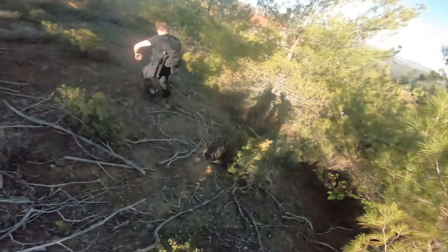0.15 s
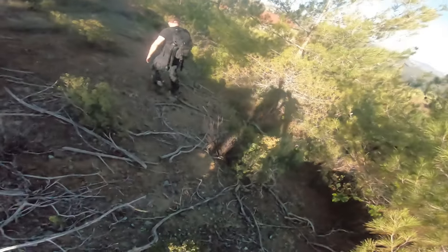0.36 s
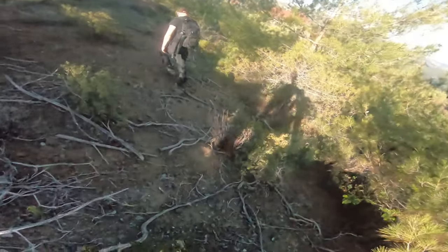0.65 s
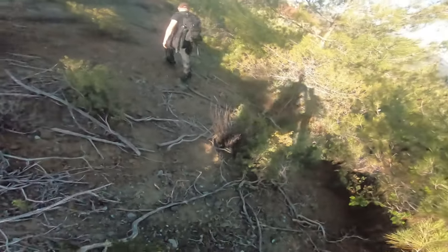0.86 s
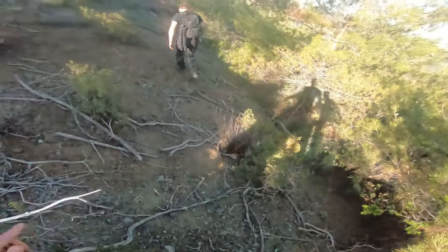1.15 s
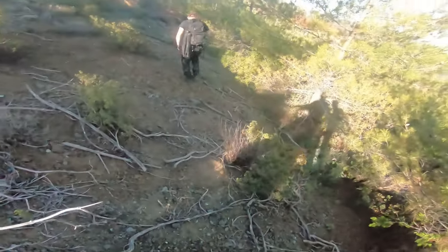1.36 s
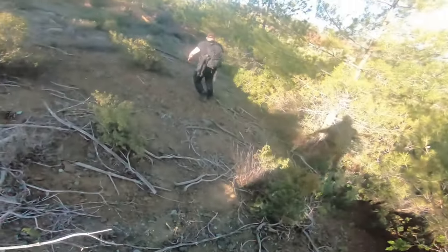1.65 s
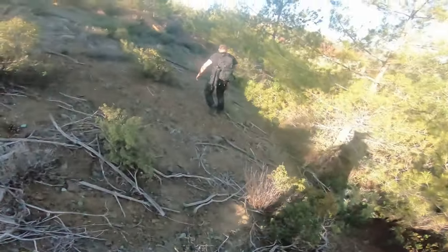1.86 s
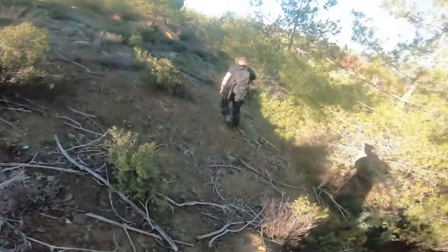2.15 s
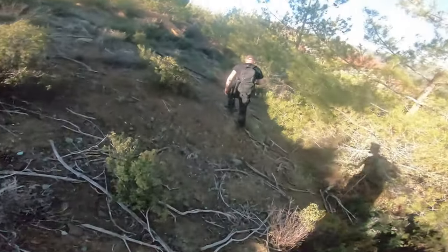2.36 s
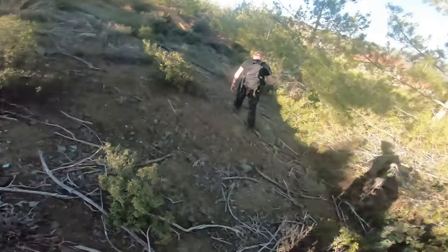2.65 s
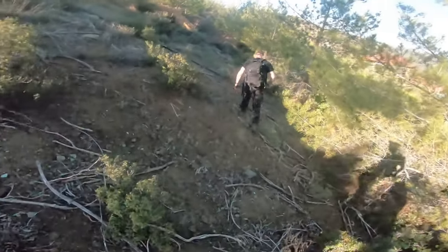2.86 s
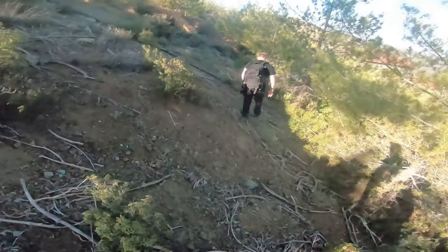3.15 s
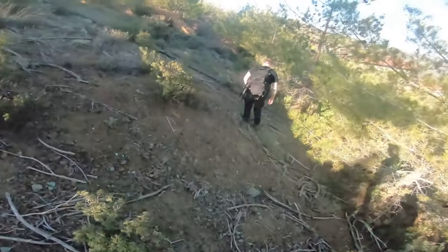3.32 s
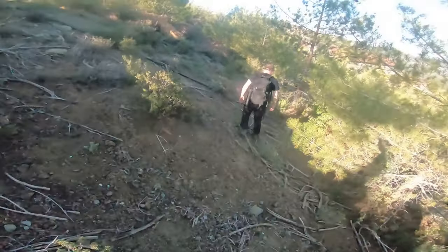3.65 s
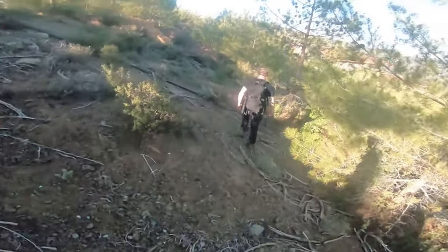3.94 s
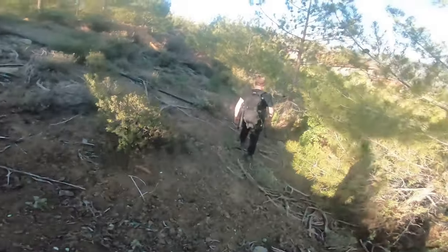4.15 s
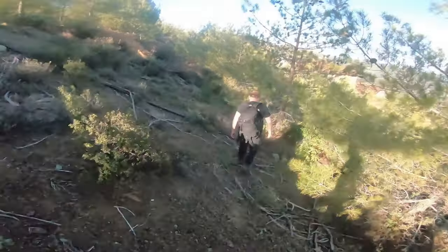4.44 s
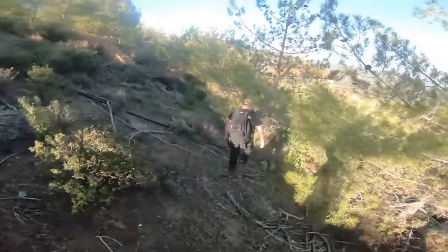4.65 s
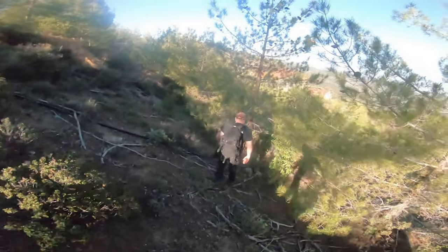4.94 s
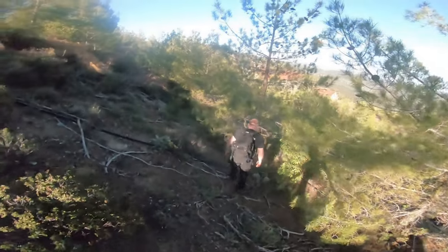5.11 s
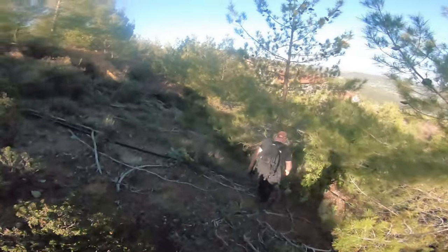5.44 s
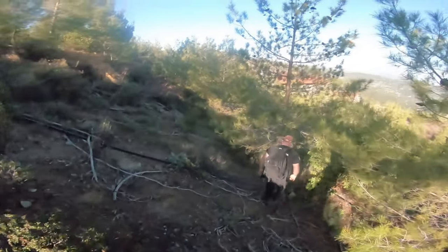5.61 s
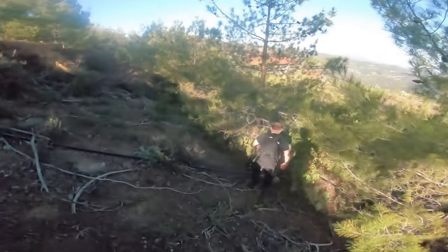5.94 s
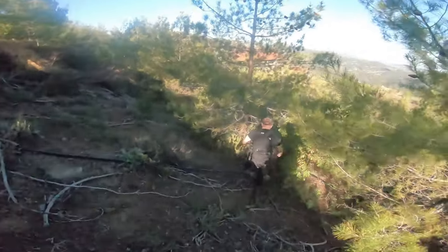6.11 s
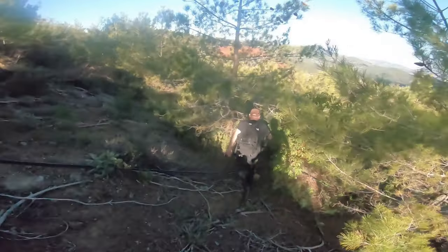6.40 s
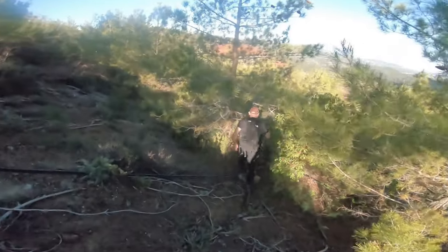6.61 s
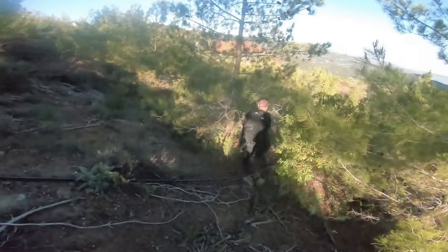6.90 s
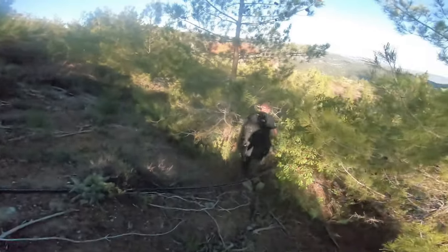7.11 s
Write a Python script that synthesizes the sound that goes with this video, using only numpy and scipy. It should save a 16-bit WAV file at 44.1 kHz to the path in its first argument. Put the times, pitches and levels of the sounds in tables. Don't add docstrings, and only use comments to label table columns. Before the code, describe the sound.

Close, brittle footsteps over dead twigs and needles, with crackles, one very sharp branch crack, cloth rustle and faint wind buffeting outdoors.

```python
import sys
import numpy as np
from scipy import signal
from scipy.fft import rfft, irfft, next_fast_len
from scipy.io import wavfile
from scipy.ndimage import uniform_filter1d

SR = 44100
rng = np.random.default_rng(int(sys.argv[2]) if len(sys.argv) > 2 else 0)


def nominal_scale(level):
    x = np.asarray(level, float) / 20
    return 10 ** x


def wav_out(sig):
    wavfile.write(sys.argv[1], SR, np.round(np.clip(np.atleast_2d(sig).T, -1, 1) * 32767).astype(np.int16))


N = 320607


def unit(x):
    return x / np.sqrt(np.mean(x ** 2) + 1e-20)


def along(points, hz):
    point_hz, value = np.transpose(points)
    return np.interp(np.log(hz + 1), np.log(point_hz + 1), value)


def sides(pan_db):
    left, right = nominal_scale(pan_db / 2), nominal_scale(-pan_db / 2)
    return 2 * np.array([left, right]) / (left + right)


def coloured(x, spectrum):
    m = next_fast_len(N + 8192)
    gain = nominal_scale(along(spectrum, np.fft.rfftfreq(m, 1 / SR)))
    return unit(irfft(rfft(x, m) * gain, m)[..., :N])


def pair(alike):
    a, b = rng.standard_normal((2, N))
    turn = np.arccos(np.clip(alike, -1, 1)) / 2
    return np.cos(turn) * a + np.sin(turn) * np.array([b, -b])


def bursts(rate, spread_db, t60, bed):
    moment, chance = rng.random((2, N))
    size_db = spread_db * np.minimum(-np.log(chance + 1e-9), 3.2)
    size = (moment < rate / SR) * nominal_scale(size_db)
    power = signal.lfilter([1], [1, -nominal_scale(-120 / (t60 * SR))], size ** 2)
    return np.sqrt(power / np.mean(power) + bed ** 2)


def swells(s, peak_db, rise, fall, rest_db, roundness):
    t = np.arange(0, N + 64, 64) / SR
    late = t - s[:, None]
    slope_s = np.where(late < 0, rise[:, None], fall[:, None])
    away = np.abs(late) / np.clip(slope_s, .01, 2)
    power = nominal_scale(2 * (peak_db[:, None] - 10 * away ** roundness)).sum(0) + nominal_scale(2 * rest_db)
    return np.interp(np.arange(N) / SR, t, 10 * np.log10(power))


def place(rows, starts):
    index = np.round(starts * SR).astype(int)[:, None] + np.arange(rows.shape[-1])
    return np.array([np.bincount(index.ravel(), r.ravel(), N + SR)[:N] for r in rows])


# (time [s], boot left-right [dB], rub left-right [dB])
BEARINGS = [(0.0, 2, 1), (0.83, -6.5, -6), (1.4, 0, 1.5), (2.21, -2, -9), (2.57, -10, -6.5),
            (2.93, -3.5, -3), (3.3, -11.5, -5.5), (3.66, -3.5, 2), (4.25, -10.5, -12), (4.46, -2, -3),
            (4.76, -14, -11.5), (4.92, -2.5, -7.5), (6.52, -8.5, -11), (7.27, -7.5, -3)]


def bearing():
    s, boot_db, rub_db = np.transpose(BEARINGS)
    t = np.arange(N) / SR
    return np.interp(t, s, boot_db), np.interp(t, s, rub_db)


# (frequency [Hz], level [dB])
PORT_RESPONSE = [(100, -35), (160, 10), (7800, -6.5), (9000, -6.5), (11000, -18.5), (15000, -26),
                 (16500, -60)]
# (frequency [Hz], lead of the left side [rad])
PORT_PHASE = [(4500, 1), (6800, -1), (9200, -2), (11500, -8.5), (15200, -7.5)]


def breaks(rows, size):
    s, peak_db, ring_hz, t60, share = np.transpose(rows)[:, :, None]
    t = np.arange(size) / SR
    noise = rng.standard_normal((len(rows), 2, size))
    stereo = np.array([noise[:, 0] + 0.22 * noise[:, 1], noise[:, 0] - 0.3 * noise[:, 1]])

    life = np.clip(t60, .002, .12)
    onset = 1 - np.exp(-t / (0.011 * life))
    decay = nominal_scale(-60 * t / life) + nominal_scale(-7.5 - 60 * t / (4 * life))
    splinter = decay * onset * (t < t[-1] / 2)
    kick = 9 * np.exp(-life / 0.015) * (np.arange(size) == 8)

    f = np.fft.rfftfreq(size, 1 / SR)
    width = np.clip(share, .04, 3) * ring_hz
    ring = 1j * f * width / (ring_hz ** 2 - f ** 2 + 1j * f * width)
    bare = 1j * f / (1200 + 1j * f) / (1 + 1j * f / (3.9 * ring_hz)) ** 2
    stick = ring ** 2 + nominal_scale(-20) * np.clip(share, 0, 1) * bare
    lead = along(PORT_PHASE, f) * np.array([[[1]], [[-1]]])
    ports = nominal_scale(along(PORT_RESPONSE, f)) * np.exp(.5j * lead)
    crack = irfft(rfft(stereo * splinter + kick) * stick * ports, size)
    crack = crack / np.abs(crack).max(2, keepdims=True).mean(0)

    at = np.minimum(s * SR, N - 1).astype(int)
    boot_db, rub_db = bearing()
    pan_db = np.where(ring_hz < 1800, rub_db[at], boot_db[at])
    return place(np.roll(crack, 64, axis=2) * nominal_scale(peak_db) * sides(pan_db), s[:, 0] - 64 / SR)


def with_width(kinds):
    return [(*row, width) for rows, width in kinds for row in rows]


# (time of most pressure [s], crunch [dB], 10 dB rise [s], 10 dB fall [s], brightness [dB])
SOLE_LOADS = [(.05, -50, 0.2, 0.26, -5.5), (0.209, -49, 0.05, .15, -10), (.32, -51, .15, .04, -8),
              (.69, -48.5, 0.13, 0.4, -3.5), (1.29, -47.5, 0.21, 0.18, -3), (1.44, -49.5, 0.06, 0.2, -2),
              (1.68, -46, 0.1, 0.47, -4), (2.24, -51, .4, 0.13, -5.5), (2.54, -47, 0.2, 0.09, -2.5),
              (2.7, -59, -0.7, 0, 4), (3.09, -57, 0.95, 0, -4.5), (3.26, -40, 0.01, 0.085, -5),
              (3.45, -49, -0.05, 0.31, -3.5), (4.28, -47, 0.16, 0.25, -3.5), (4.38, -52, -0.09, 0.27, 1),
              (4.48, -53, -0.18, 0, 1.5), (4.667, -43, 0.0845, 0.11, -0.5), (4.6, -48, .03, .1, 2),
              (4.745, -48, .1, .02, -1), (4.916, -44.5, -0.06, 0.17, -2), (5.09, -48.5, 0.16, -0.18, -4),
              (5.215, -54.5, -0.17, 1.8, -1.5), (5.72, -54.5, 0.2, 0.85, -1), (5.98, -38, 0.06, 0.08, -4.5),
              (6.35, -51.5, .06, .25, -1.5), (6.47, -50, .12, .1, -3), (6.605, -48, 0, 0.7, 1.5),
              (7.16, -49, 0.17, 2, -2)]


def pressure():
    s, peak_db, rise, fall, bright_db = np.transpose(SOLE_LOADS)
    rest_db, rest_bright_db, roundness = -63.5, -10, 1.08
    crunch_db = swells(s, peak_db, rise, fall, rest_db, roundness)
    fizz_db = swells(s, peak_db + bright_db, rise, fall, rest_db + rest_bright_db, roundness)
    return crunch_db, fizz_db - crunch_db


# (frequency [Hz], level [dB])
CRUNCH_COLOUR = [(600, -13), (1300, 0), (2200, 0), (3200, 2.5), (4200, -2.5), (5500, -8), (8000, -95)]
FIZZ_COLOUR = [(2800, -35), (4700, -2), (6000, -1.5), (7800, -2), (9000, -6.5), (10500, -16), (12500, -74)]
SIZZLE_COLOUR = [(8500, -7), (10500, 1), (13000, -1), (15600, -15)]


def litter():
    crunch_db, bright_db = pressure()
    pan_db = bearing()[0]
    shared = bursts(260, spread_db=2.6, t60=.012, bed=1.15)
    coarse = bursts(200, spread_db=3, t60=.02, bed=1.3)
    fine = bursts(300, spread_db=3, t60=.01, bed=1.3)
    crunch = coloured(shared * coarse * pair(0.63), CRUNCH_COLOUR)
    fizz = coloured(shared * fine * pair(0.041), FIZZ_COLOUR)
    sizzle = sides(0.094 * pan_db) * coloured(shared ** 0.67 * fine * pair(-0.2), SIZZLE_COLOUR)
    fizz_db = crunch_db + bright_db
    sizzle_db = fizz_db - 18.5 + 0.35 * (fizz_db + 54.5)
    body = nominal_scale(crunch_db) * crunch + nominal_scale(fizz_db) * fizz
    return sides(pan_db) * body + nominal_scale(sizzle_db) * sizzle


# (frequency [Hz], level [dB])
FLOOR_COLOUR = [(70, -36), (170, 10), (1800, 0.5), (3200, 1), (8000, -3.5), (10500, -17), (13000, -53)]


def floor():
    return nominal_scale(-51.5 - 7.5) * coloured(pair(0.11), FLOOR_COLOUR)


def crackle(count):
    moment, pitch, chance, life, share = rng.random((count, 5)).T
    s = .01 + moment * (N / SR - .02)
    crunch_db = pressure()[0][(s * SR).astype(int)]
    peak_db = crunch_db + 6.5 + 2.5 * np.minimum(-np.log(chance + 1e-9), 2.1)
    ring_hz = 2000 * 4 ** pitch
    t60 = 0.0025 + 0.0067 * life ** 2
    return breaks(np.transpose([s, peak_db, ring_hz, t60, .7 + 1.5 * share]), size=512)


# (time [s], peak [dB], ring [Hz], t60 [s])
THIN_TWIGS = [(.0352, -37, 4040, 0.0074), (.429, -36, 3320, .014), (.4923, -34, 3450, 0.0036),
              (.698, -29.5, 690, 0.0068), (.9494, -35, 925, 0.0083), (1.4447, -29.5, 750, 0.013),
              (1.598, -35.5, 3230, 0.14), (1.7355, -28, 3980, .005), (1.7445, -29, 3780, .013),
              (1.7666, -31.5, 3870, 0.024), (1.8484, -31, 1240, 0.0093), (2.0442, -38, 2950, .021),
              (2.1608, -32, 4480, 0.0025), (2.2861, -34, 940, 0.016), (2.398, -31.5, 950, 0.013),
              (2.67, -37.5, 2610, 0.0051), (2.999, -35, 694, .015), (3.272, -33, 1520, 0.026),
              (3.408, -34.5, 2690, 0.012), (4.4508, -28, 4020, 0.029), (4.6779, -27.5, 820, 0.14),
              (5.0366, -33, 4350, 0.025), (5.317, -34, 1040, 0.051), (5.9598, -20, 3770, 0.021),
              (6.026, -24, 3000, 0.0041), (6.6885, -33, 3250, 0.016), (6.8606, -31.5, 2880, 0.012),
              (6.9272, -25, 6800, 0.0042), (6.9785, -22, 3150, 0.0025)]
# (time [s], peak [dB], centre [Hz], t60 [s])
SHATTERED_WOOD = [(.3532, -25.5, 910, 0.0037), (.3753, -29, 1510, 0.0061), (.668, -34, 1330, 0.0098),
                  (.8393, -31.5, 4070, 0.038), (1.279, -37, 5000, .012), (1.4297, -30, 1950, .015),
                  (2.5154, -29, 3400, 0.022), (2.7071, -36, 5100, 0.032), (3.1405, -35.5, 1140, 0.029),
                  (3.2275, -22.5, 2730, 0.035), (3.2473, -18.5, 3500, 0.02), (3.9444, -34.5, 1540, 0.0064),
                  (4.3842, -25.5, 4800, 0.0095), (4.514, -24.5, 2790, 0.017), (4.5775, -31, 5600, 0.14),
                  (4.6715, -24, 1800, 0.016), (4.7276, -24, 1190, 0.0046), (5.238, -31, 3520, 0.052),
                  (5.477, -29.5, 2920, 0.0054), (5.6043, -21.5, 4130, 0.014), (5.834, -28, 2900, 0.019),
                  (5.9495, -18, 3730, 0.03), (5.9833, -20, 3380, 0.028), (6.005, -26, 3000, .028),
                  (6.0137, -18.5, 3640, 0.015), (6.5984, -29.5, 6030, 0.025), (6.7646, -28.5, 4900, 0.039),
                  (6.7894, -24.5, 3820, 0.014), (7.03, -29.5, 2160, 0.039), (7.211, -25.5, 4420, .003)]
# (time [s], peak [dB], ring [Hz], t60 [s])
THICK_TWIGS = [(.5546, -35.5, 930, 0.0052), (.791, -26, 2520, 0.0043), (.9992, -36, 1500, .004),
               (1.1693, -31, 4720, 0.013), (1.2895, -34.5, 1890, 0.035), (1.384, -28.5, 5000, .003),
               (2.0665, -22.5, 3720, 0.012), (2.207, -31.5, 5470, 0.04), (2.4446, -32.5, 1930, 0.011),
               (2.4743, -30, 880, 0.022), (2.5322, -24.5, 6700, 0.017), (2.56, -19, 8800, 0.002),
               (2.5615, -33, 1800, 0.008), (2.64, -31, 1010, 0.0057), (2.8223, -30.5, 5100, 0.0054),
               (3.2648, -22, 2700, 0.017), (3.3052, -24, 5600, 0.012), (3.3735, -29.5, 2050, .015),
               (3.867, -35, 880, 0.0068), (4.5382, -27, 3960, 0.0088), (4.7632, -31, 990, 0.004),
               (4.77, -17, 930, 0.0018), (4.9242, -31, 5350, 0.017), (5.153, -33.5, 4400, 0.022),
               (5.3574, -27, 4500, 0.0077), (5.4829, -31.5, 1150, 0.0051), (5.5186, -32, 4800, 0.0076),
               (5.9195, -25, 3500, 0.024), (5.9923, -17.5, 4400, 0.02), (6.7078, -24.5, 5700, 0.0059)]
# (time [s], peak [dB], ring [Hz], t60 [s])
RINGING_STICKS = [
    (1.661, -35, 4200, 0.022),
    (1.672, -26.5, 3360, .02),
    (1.673, -35, 5300, 0.016),
    (1.6778, -24.5, 3330, 0.0073),
    (4.3732, -31.5, 5300, 0.0079),
    (4.467, -35, 4900, 0.028),
    (5.1527, -36.5, 1620, 0.012),
    (6.727, -38, 1650, 0.043),
]
CLICK_WIDTH, SHARD_WIDTH = 0.56, 2.2


def snaps():
    kinds = [(RINGING_STICKS, 0.11), (THIN_TWIGS, CLICK_WIDTH), (THICK_TWIGS, 0.93), (SHATTERED_WOOD, SHARD_WIDTH)]
    return breaks(with_width(kinds), size=4096)


# (time [s], peak [dB], ring [Hz])
HOUSING_KNOCKS = [(0.085, -36.5, 365), (0.124, -36, 161), (0.889, -44, 224), (2.816, -45.5, 164),
                  (2.904, -46, 322), (3.006, -40, 250), (3.539, -39, 340), (5.054, -39.5, 270),
                  (.649, -51, 226), (.82, -51, 132), (1.421, -46, 148), (1.497, -41, 332),
                  (1.842, -51, 226), (2.286, -48, 260), (3.224, -50, 154), (3.376, -55, 228),
                  (3.412, -44, 380), (3.62, -44.5, 383), (4.51, -49, 280), (4.583, -43, 330),
                  (4.611, -45, 229), (4.76, -55, 80), (4.891, -50, 189), (4.951, -48.5, 202),
                  (5.286, -48, 180), (5.543, -47, 235), (5.744, -45, 189), (5.97, -47, 202),
                  (6.03, -55.5, 80), (6.849, -54, 213)]


def knocks():
    s, peak_db, ring_hz = np.transpose(HOUSING_KNOCKS)[:, :, None]
    cycles = ring_hz * np.arange(4096) / SR
    ring = np.sin(2 * np.pi * cycles) * cycles * np.exp(1 - cycles) / 0.59
    left_right = nominal_scale([[[-.7]], [[.7]]])
    return place(nominal_scale(peak_db - 1.0) * ring * left_right, s[:, 0])


# (time [s], peak [dB], ring [Hz], t60 [s])
SMALL_STICKS = [(.087, -30, 610, .01), (.779, -33, 622, .01), (.888, -38, 568, .008),
                (1.562, -42, 732, .008), (1.575, -35, 600, 0.011), (1.603, -34, 730, 0.013),
                (1.675, -35, 655, 0.0087), (2.063, -36, 546, .008), (2.272, -36, 700, .006),
                (2.359, -33, 810, .008), (2.513, -33, 880, .008), (2.606, -39.5, 896, .008),
                (2.802, -41, 625, .008), (4.17, -37, 781, 0.013), (4.249, -32, 869, .012),
                (4.655, -33, 678, .012), (5.005, -35, 890, 0.0095), (5.065, -35, 1010, .008),
                (5.075, -34.5, 700, .008), (5.224, -39, 810, 0.0093), (5.602, -33.5, 1150, 0.0072),
                (5.878, -38, 829, .008), (6.36, -34, 895, 0.011), (6.456, -37, 1000, 0.013),
                (6.688, -47, 1120, 0.005), (1.688, -27, 3300, .012), (1.688, -31, 5300, .008),
                (5.165, -43.5, 3250, .04), (3.2473, -26, 6700, 0.0054), (3.2648, -29, 7900, 0.0061),
                (2.5415, -26, 7200, .006), (.9988, -22, 2500, .002), (.899, -35, 7800, .003),
                (4.6718, -26, 6500, .004), (4.9232, -30, 8800, .004), (5.3567, -31, 3400, .004),
                (5.953, -25, 1400, .015), (3.268, -27, 3000, .02), (6.79, -27, 2600, .004),
                (7.0295, -29, 1700, .004), (4.265, -33, 5000, .006), (3.577, -37, 7800, .004),
                (3.086, -39, 7800, .004), (3.756, -39, 3200, .004), (2.962, -39, 6500, .004),
                (4.72, -31, 1000, .02), (4.70, -30, 850, .02), (.175, -38, 6500, .004)]
# (time [s], peak [dB], centre [Hz], t60 [s])
MORE_SHATTERED_WOOD = [(.8275, -31, 3060, .005), (1.2032, -39, 3650, .005), (1.4277, -27, 5000, .004),
                       (1.716, -35, 4200, .005), (2.2872, -33, 2500, 0.0057), (2.3795, -31, 3500, .004),
                       (2.4165, -39, 5000, .004), (2.4758, -26, 5460, 0.0072), (2.5027, -33, 4020, .01),
                       (2.6389, -33, 5000, 0.0049), (3.221, -35, 1500, 0.013), (3.284, -32, 3500, 0.0091),
                       (3.292, -29.5, 2500, 0.0067), (4.5905, -27, 2730, 0.0082), (4.7691, -32, 5000, .003),
                       (4.852, -41, 6000, 0.011), (4.9057, -35, 2800, 0.0065), (4.9696, -29, 4020, 0.013),
                       (5.11, -35, 4000, .01), (5.205, -40, 3500, .02), (5.4779, -33, 5260, 0.0045),
                       (5.716, -34, 3500, 0.023), (5.785, -37, 5500, .006), (5.9529, -12, 4160, 0.01),
                       (5.968, -18, 3200, .008), (6.0526, -29, 3400, .006), (6.065, -31, 5200, 0.0056),
                       (6.159, -34, 8000, .006), (6.2025, -39, 7000, .004), (6.376, -36, 3500, .005),
                       (6.445, -37, 5500, 0.0045), (6.5809, -32.5, 3230, 0.0064), (6.607, -25, 4000, 0.0058),
                       (6.64, -33, 5000, 0.015), (6.689, -30, 6500, .004), (6.8463, -31.5, 2200, .008),
                       (6.9027, -28, 6740, .006)]
# (time [s], peak [dB], ring [Hz], t60 [s])
THICK_BRANCH = [
    (2.56, -5.5, 7720, 0.0024),
    (2.56, -12, 5600, 0.0025),
    (2.56, -20.5, 4000, 0.0023),
    (2.56, -25.5, 3300, 0.0018),
    (2.5602, -30, 1610, 0.0037),
    (2.566, -31, 7000, .004),
]


def chips():
    kinds = [(THICK_BRANCH, .22), (SMALL_STICKS, CLICK_WIDTH), (MORE_SHATTERED_WOOD, SHARD_WIDTH)]
    return breaks(with_width(kinds), size=2048)


# (time [s], bump [dB], rub [dB], 10 dB fall [s])
CLOTH_SWINGS = [(.1, -40.5, -41.5, 0.1052), (.22, -49.5, -45.5, 0.11), (.31, -53, -50, .06),
                (0.722, -44.5, -43.5, 0.12), (.95, -52.5, -55.5, 0.2), (1.17, -56, -48.5, 0.1),
                (1.45, -42.5, -45, 0.08), (1.58, -51, -48, 0.08), (1.68, -44.5, -51.5, .08),
                (1.864, -47, -44.5, 0.0952), (2.078, -53, -48, 0.04), (2.29, -49, -47, .09),
                (2.43, -53, -60, 0.06), (2.56, -53, -51, 0.27), (2.819, -46, -57, -0.08),
                (2.91, -69, -66, 1), (3.04, -58, -53, 0.2), (3.19, -57, -52.5, 0.28),
                (3.538, -51, -48.5, 0.14), (4.19, -52, -47, .15), (4.37, -56, -51, .12),
                (4.275, -47, -42.5, 0.08), (4.5, -46, -62, -0.07), (4.68, -44, -43, 0.09),
                (5.069, -47, -46, 0.04), (5.344, -43.5, -44, -0.09), (5.58, -52, -47.5, 0.15),
                (5.76, -47, -46.5, 0.26), (5.98, -41.5, -47, 0.06), (6.35, -47.5, -46.5, 0.09),
                (6.459, -50.5, -44.5, 0.1), (6.41, -51, -47, 0.14), (5.39, -55.5, -53, 0.08),
                (6.76, -56.5, -52, 0.5), (4.93, -51, -56.5, 0.22)]
# (frequency [Hz], level [dB])
BUMP_COLOUR = [(50, -57), (90, -39), (120, -13.5), (160, -0.5), (250, -0.5), (420, -2.5), (650, -49)]
RUB_COLOUR = [(280, -42), (470, 6), (750, 5.5), (1100, 1.5), (1900, -5.5), (4300, -35.5)]


def cloth():
    s, bump_db, rub_db, fall = np.transpose(CLOTH_SWINGS)
    rise, roundness = 0.75 * fall, 1.12
    bump_db = swells(s, bump_db, rise, fall, -68.5, roundness)
    rub_db = swells(s, rub_db, rise, fall, -63, roundness)
    shared = bursts(150, spread_db=1.8, t60=.035, bed=1.4)
    thuds = bursts(90, spread_db=3.5, t60=0.024, bed=0.89)
    grit = bursts(250, spread_db=2.6, t60=.02, bed=1.1)
    bump = coloured(shared * thuds * pair(0.98), BUMP_COLOUR)
    rub = coloured(shared * grit * pair(0.67), RUB_COLOUR)
    return nominal_scale(bump_db) * bump + nominal_scale(rub_db) * sides(bearing()[1]) * rub


# (time [s], level [dB], 10 dB rise [s], 10 dB fall [s], left-right [dB])
AIR_PUFFS = [(.11, -45.5, -0.1, 0.06, 0), (.77, -46, 0.13, 0.16, -13), (1.43, -63, -0.5, -0.4, -3.5),
             (1.99, -53, 0.07, 0.15, -14), (2.62, -51, 0, 0.18, -13.5), (4.14, -47.5, 0.025, 0.2, -12),
             (4.72, -52, 0.12, -0.3, -14.5), (4.84, -59, 0, .03, -12), (5.33, -45, -0.18, 0.08, -17),
             (5.82, -42.5, 0, 0.2, -1), (6.27, -54.5, 0.17, -0.3, -1), (6.4, -36.5, -0.01, 0, -17),
             (6.5, -46, 0.17, -0.28, -11), (6.84, -54, 0.23, -0.1, -8), (6.98, -61, 0.3, -0.16, -13)]
# (frequency [Hz], level [dB])
PUFF_COLOUR = [(12, -6), (28, 10.5), (45, -2.5), (70, -9), (100, -24), (140, -69)]


def air():
    s, peak_db, rise, fall, pan_db = np.transpose(AIR_PUFFS)
    calm_db, roundness = -83, 1.7
    level_db = [swells(s, peak_db + 20 * np.log10(gain), rise, fall, calm_db, roundness)
                for gain in sides(pan_db)]
    swing = coloured(pair(0.48), PUFF_COLOUR)
    local_power = uniform_filter1d(swing ** 2, size=SR // 12)
    even = swing / np.sqrt(np.abs(local_power) + 0.12)
    return nominal_scale(level_db) * unit(even)


def scene():
    wood = litter() + crackle(count=1500) + snaps() + chips()
    return wood + floor() + knocks() + cloth() + air()


def top_cut(x):
    return signal.sosfilt(signal.butter(12, 16550, fs=SR, output="sos"), x)


def record(dry):
    top_hz = 15830
    m = next_fast_len(N + 8192)
    passed = np.fft.rfftfreq(m, 1 / SR) < top_hz
    kept = irfft(rfft(dry, m) * passed, m)[:, :N]
    return top_cut(kept)


dry = scene()
out = record(dry)
wav_out(out)
```